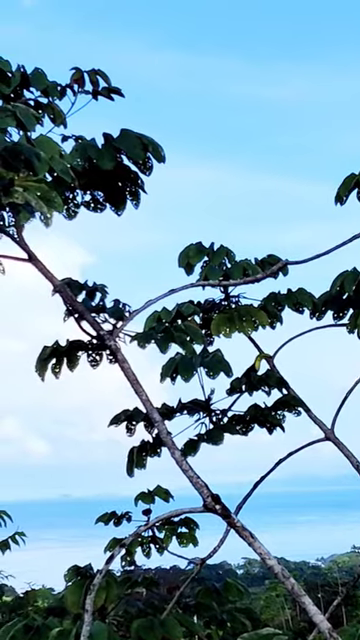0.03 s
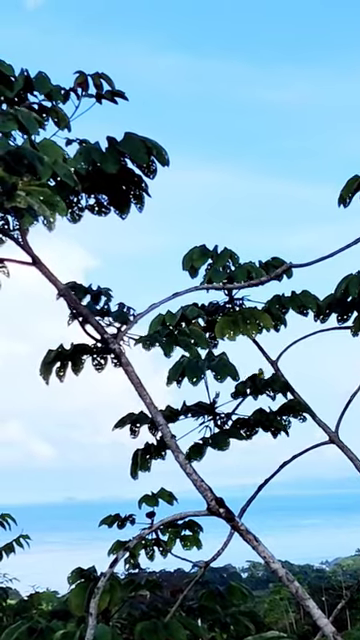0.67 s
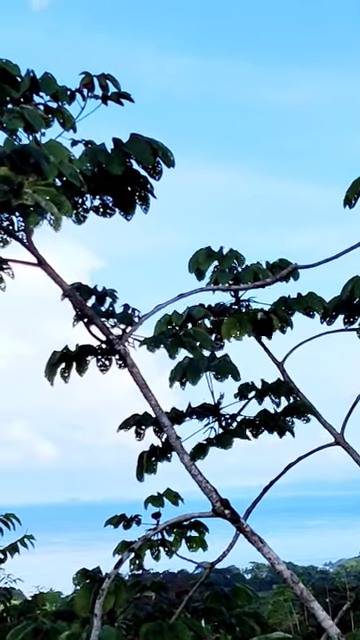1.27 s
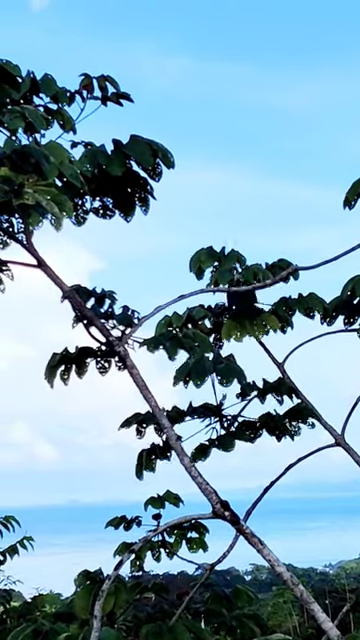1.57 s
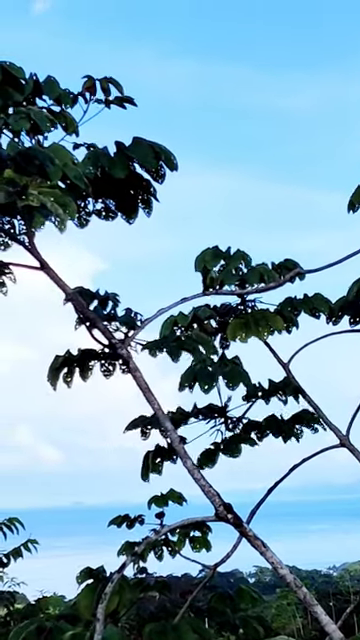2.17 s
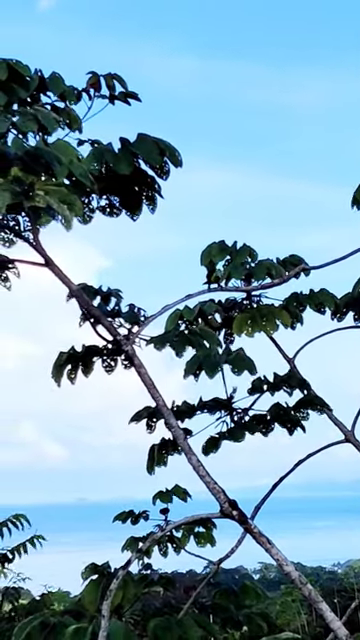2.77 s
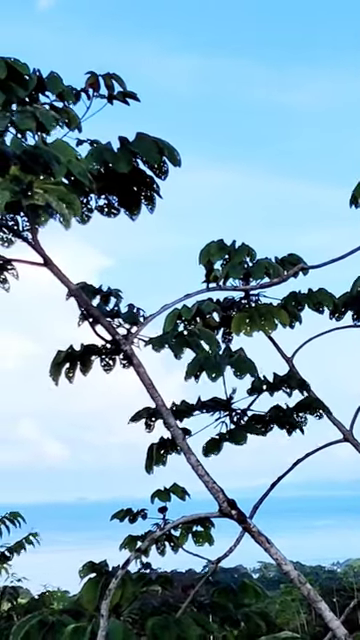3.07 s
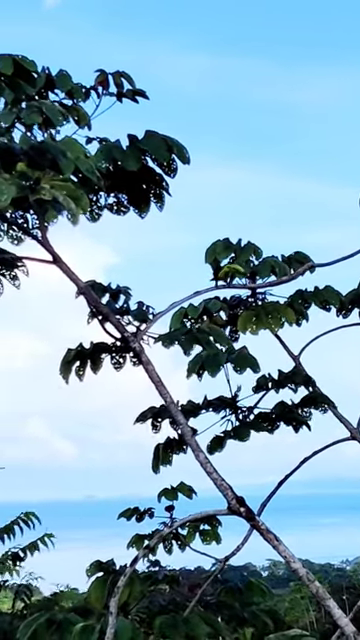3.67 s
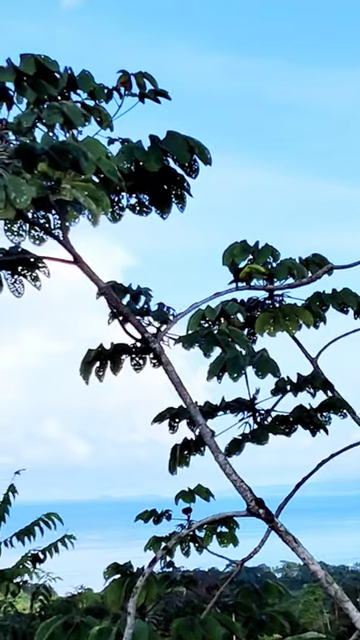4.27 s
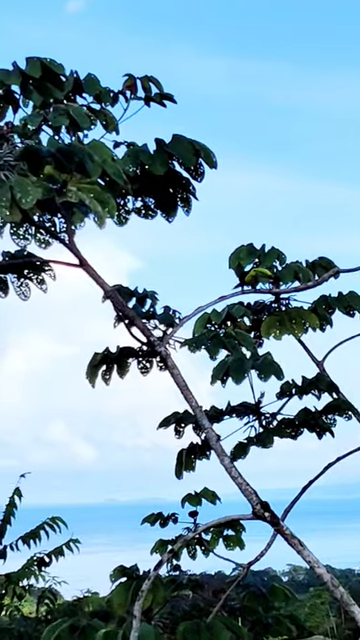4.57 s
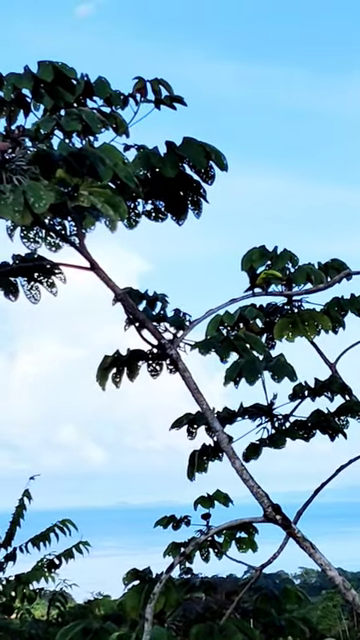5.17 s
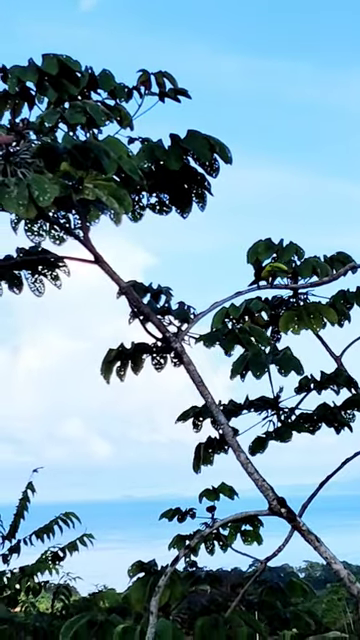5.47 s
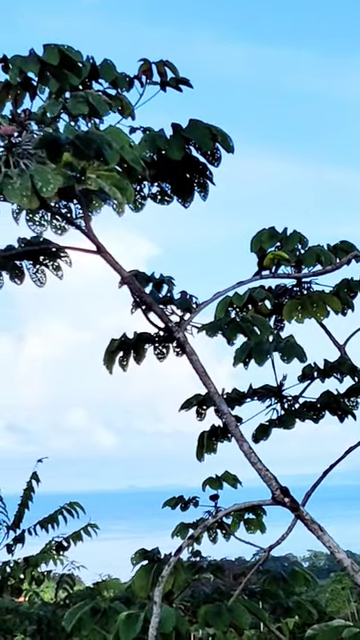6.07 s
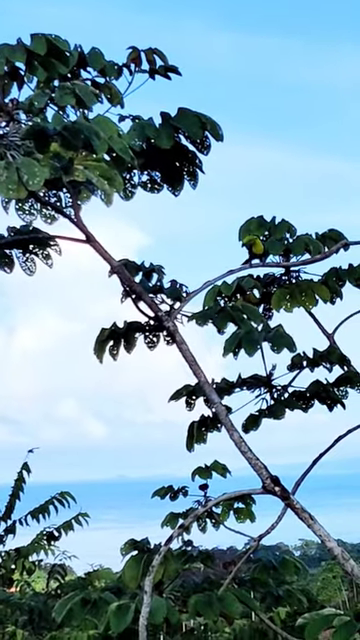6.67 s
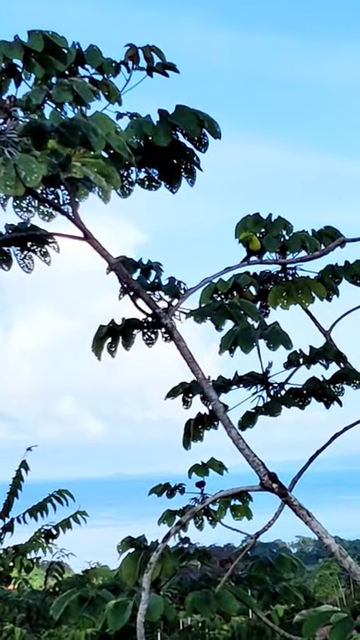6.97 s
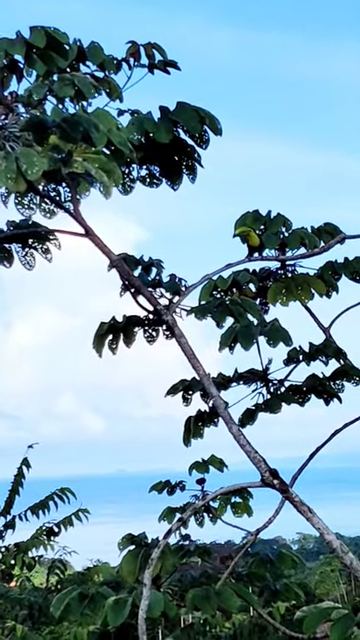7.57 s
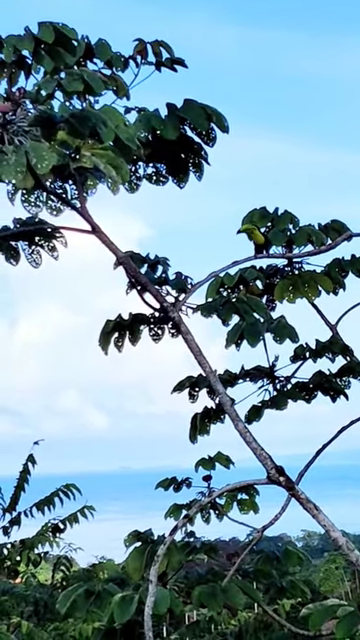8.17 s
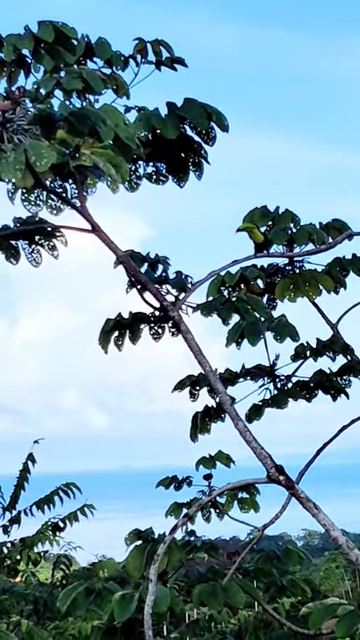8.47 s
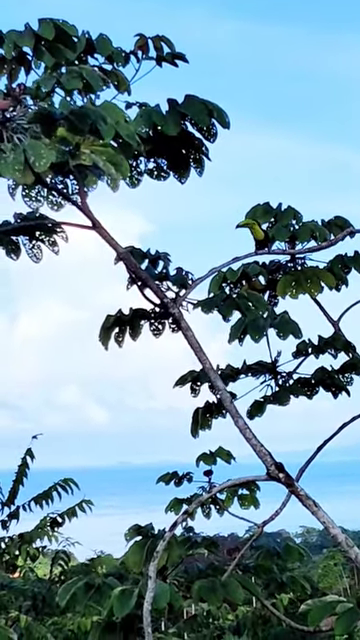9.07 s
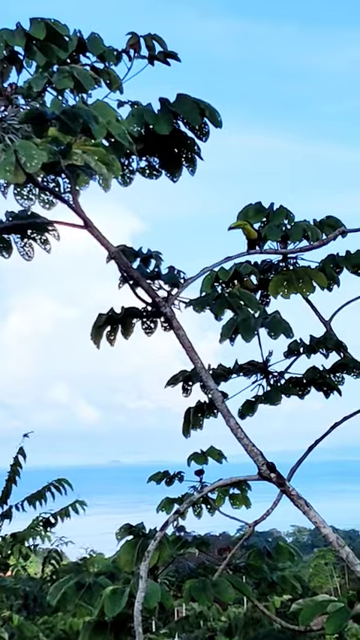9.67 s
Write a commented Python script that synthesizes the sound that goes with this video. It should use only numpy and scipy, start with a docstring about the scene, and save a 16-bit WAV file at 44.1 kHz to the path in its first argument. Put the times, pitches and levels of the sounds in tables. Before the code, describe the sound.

Toucans call with sharp falling chirps, nasal yelps and dry rattles over steadily buzzing insects in a forest.

```python
"""Toucans call in a tree on a forested hillside: one gives sharp falling chirps, another nasal yelps
and dry rattles. Each call is a frequency-modulated tone with harmonics, shaped by a swell or by pulses.
Farther birds whistle and trill in pure tones, and insects buzz steadily over a low distant rumble
and a faint hiss. The foliage scatters every bird call back as reverberation."""
import sys
import numpy as np
from scipy import signal
from scipy.fft import rfft, irfft
from scipy.io import wavfile

SR = 44100
rng = np.random.default_rng(int(sys.argv[2]) if len(sys.argv) > 2 else 0)


def generate_wav(sig):
    """Save sig (samples, or channels by samples) to the path in sys.argv[1] as 16-bit PCM at SR."""
    pcm = np.round(np.clip(np.atleast_2d(sig).T, -1, 1) * 32767).astype(np.int16)
    wavfile.write(sys.argv[1], SR, pcm)


N = 437472
TIME = np.arange(N) / SR

# Levels in the tables are relative. Yelps: onset t/s, duration/s, final f/Hz, level/dB
YELP_CALLS = [(-.1, .2, 1727, -48), (0.49, .22, 1790, -46), (1.095, 0.21, 1761, -42),
              (1.727, 0.2, 1781, -42.5), (2.362, .17, 1745, -48), (4.138, 0.14, 1693, -48.5),
              (4.827, .15, 1663, -49.5), (5.482, 0.15, 1664, -48.5), (6.158, 0.17, 1723, -46.5),
              (6.786, 0.15, 1716, -44.5), (7.412, .16, 1672, -47.5), (8.007, .15, 1674, -48),
              (8.632, 0.15, 1653, -50), (9.31, 0.14, 1663, -51)]
# Spectrum of the far insects: f/Hz, level/dB
CHORUS_SPECTRUM = [(5250, -61.5), (5550, -13), (5850, -10), (6150, -6.5), (6380, -8), (6620, -6.5),
                   (6800, -13.5), (7050, -56)]
# Spectrum of the distant rumble: f/Hz, level/dB
RUMBLE_SPECTRUM = [(15, -27), (25, 3), (96, -2.5), (318, -14), (403, -18), (690, -18.5), (1090, -25.5),
                   (1400, -37), (1820, -66), (3080, -120)]
# Spectrum of the forest's hiss: f/Hz, level/dB
HISS_SPECTRUM = [(700, -27), (1200, -0.5), (1800, 1), (2500, 0.5), (4000, -2.5), (5300, -5.5),
                 (7000, -13.5), (8000, -9.5), (9000, -28), (12500, -18.5)]
# Chirps: mid-fall t/s, level/dB, fall rate/(Hz/s), lead-in level re the chirp/dB
CHIRP_CALLS = [(0.383, -32.5, 25100, -2.5), (0.6357, -34.5, 31200, -25), (0.9227, -34, 28500, -16),
               (1.2495, -33, 33800, -19), (1.8619, -34, 27500, -4), (2.1787, -33.5, 32200, -9),
               (3.144, -34.5, 29400, -5), (3.659, -30.5, 26500, -12), (4.0055, -33.5, 29400, -11),
               (5.015, -35, 28400, -3.5), (5.5828, -33, 26600, -6.5), (6.0717, -32, 28500, -10.5),
               (6.385, -34, 25800, -5), (6.945, -32.5, 26600, -8.5), (7.405, -34, 27200, -11),
               (7.887, -32, 28500, -10.5), (8.7736, -34, 29800, -8), (9.2709, -33, 27400, -10),
               (9.7333, -33.5, 26400, -2)]
# Rattles: onset t/s, duration/s, nominal final f/Hz, level/dB, direct-path gain/dB
RATTLE_CALLS = [(1.413, 0.063, 2280, -48, 1), (2.839, 0.11, 2017, -41.5, -2.5),
                (2.994, 0.069, 1968, -42.5, -6), (3.552, 0.069, 1984, -42, -10),
                (4.265, 0.11, 2134, -42.5, -2), (4.458, 0.047, 2040, -40.5, -5),
                (5.081, 0.061, 2027, -41.5, 1), (5.206, .097, 2020, -45.5, 2), (5.737, .12, 2075, -41, -8),
                (7.566, 0.1, 2110, -42, 8), (8.211, 0.12, 1930, -41, 7.5), (8.885, 0.12, 2033, -39, 6),
                (9.596, 0.11, 2174, -38, 9)]
# Whistles: onset t/s, duration/s, first f/Hz, last f/Hz, glide curvature, level/dB, peak time/duration
WHISTLE_CALLS = [(1.624, .04, 2130, 2020, .2, -55, 0.42), (2.819, 0.82, 5040, 2578, 0.52, -62, 0.97),
                 (2.921, .53, 9100, 6700, 1.2, -76, 0.78), (3.047, 0.61, 473, 476, 1, -67, 0.45),
                 (3.575, .2, 8300, 7300, 4, -70, .55), (3.835, 0.12, 2645, 2920, 5.3, -51, 0.17),
                 (4.06, .265, 613, 861, 6.94, -53.5, 0.29), (6.569, .145, 8060, 3480, 2, -58, 0.61)]
# Course of the trill: t/s, note rate/Hz, f/Hz, level/dB
TRILL_COURSE = [(2.155, 15.5, 1020, -59.5), (2.878, 20.8, 936, -54), (3.2, 22.24, 1068, -49),
                (3.5, 21.69, 1014, -50.5), (3.7, 20.04, 1114, -45), (3.83, 17, 1063, -46.5)]
# Likeness of the diffuse field at the two microphones: f/Hz, correlation coefficient
COHERENCE = [(30, 0.86), (100, 0.99), (250, 0.93), (500, 0.83), (900, 0.52), (1600, 0.41), (12000, 0.14)]
# Reverberation time of the forest: f/Hz, T60/s
FOREST_T60 = [(800, 0.46), (1700, 0.8), (2600, 0.75), (5000, 0.87), (9000, 0.26)]


def amp(db):
    """Amplitude ratio of a level in decibels."""
    return 10 ** (np.asarray(db) / 20)


def unit(x):
    """Normalisation to rms 1."""
    return x / np.sqrt(np.mean(x ** 2) + 1e-20)


def read(points, hz):
    """Interpolation of a table on a logarithmic frequency axis."""
    f, value = np.transpose(points)
    return np.interp(np.log(hz + 1), np.log(f + 1), value)


def add(mix, s, sound):
    """Superposition of a sound on the mix at time s."""
    start = round(s * SR)
    sound = sound[max(-start, 0):]
    part = mix[max(start, 0):][:len(sound)]
    part += sound[:len(part)]


def wander(size, bandwidth_hz):
    """Random modulation: low-pass Gaussian noise of rms about 1."""
    hz = np.fft.rfftfreq(size + SR, 1 / SR)
    return unit(irfft(rfft(rng.standard_normal(size + SR)) * np.exp(-(hz / bandwidth_hz) ** 2)))[:size]


def angle(hz):
    """Phase as the time integral of frequency."""
    return 2 * np.pi * np.cumsum(hz) / SR


def diffuse_noise(spectrum):
    """A diffuse field at two microphones is most coherent at long wavelengths."""
    hz = np.fft.rfftfreq(N, 1 / SR)
    left, other = rfft(rng.standard_normal((2, N)))
    same = read(COHERENCE, hz)
    right = same * left + np.sqrt(1 - same ** 2) * other
    return unit(irfft(np.array([left, right]) * amp(read(spectrum, hz)), N))


def yelps(scoop=.14, pulse_hz=43, nasal_db=-49.5):
    """Amplitude modulation: croaking pulses quicken and fuse into a hoarse, rising nasal tone."""
    tone, nasal = np.zeros((2, N))
    for s, length, top_hz, db in YELP_CALLS:
        t = np.arange(-.008, length + .03, 1 / SR)
        progress = np.clip(t / length, 0, 1)
        stutter_s = .0506 * 2 ** ((top_hz - 1701) / 58.8)  # higher yelps take longer to fuse
        apart = np.clip(1 - t / stutter_s, 0, 1)
        jitter = (.018 + .05 * apart) * wander(len(t), 400)
        phase = angle(top_hz * (1 - scoop * (1 - progress) ** 1.7) * (1 + jitter))
        cycles = pulse_hz * t + 250 * np.maximum(t, 0) ** 3
        sharpness = 14 * apart ** 1.3 + .12
        pulses = (1 + 4.2 * apart * (1 - apart)) * np.exp(sharpness * (np.cos(2 * np.pi * cycles) - 1))
        swell = amp(np.interp(progress, [0, .4, .7, 1], [-7, -3.5, 0, -7]) + 2 * wander(len(t), 190))
        fade = np.clip((t[-1] - t) / .034, 0, 1) * np.clip((t - t[0]) / .0068, 0, 1)
        level = swell * pulses * fade
        overtones = sum(gain * np.sin(k * phase)
                        for k, gain in enumerate(amp([2, -2.5, -23.5, -28.5, -35]), 2))
        dull_db = 11 * (1 - progress) ** 2 + 7 * apart  # the opening croaks are nearly pure
        add(tone, s + t[0], amp(db) * level * np.sin(phase))
        add(nasal, s + t[0], amp(nasal_db - dull_db) * level * overtones)
    return tone, nasal


def insects(stroke_hz=74.7, shrill_hz=6345):
    """Body resonance filters a near insect's falling strokes, over a far chorus and a shrill note."""
    stroke = angle(stroke_hz * (1 + .003 * wander(N, 2))) / (2 * np.pi) % 1
    phase = angle(6600 - 1250 * stroke ** 1.5 + 130 * wander(N, 500))
    level = np.sin(np.pi * stroke) ** 2 * np.exp(-2.2 * stroke) * (1 + .45 * wander(N, 260))
    body = signal.butter(4, [5500, 6750], "bandpass", fs=SR, output="sos")
    buzz = unit(signal.sosfilt(body, level * np.sin(phase)))
    shrill = np.array([unit((1 + .4 * wander(N, 20)) * np.sin(angle(shrill_hz + 26 * wander(N, 60))))
                       for _ in range(2)])
    near = amp(-4) * direct_path(buzz, lag_ms=.2, left_db=5)
    far = (diffuse_noise(CHORUS_SPECTRUM) + amp(-5) * shrill) * amp([[-2.6], [-4.8]])
    return amp(-58 + .3 * wander(N, 2)) * (near + far)


def rumble_and_hiss():
    """Diffuse noise: a low rumble from afar and the forest's faint hiss, each wavering in level."""
    rumble = amp(-53.5 + .99 * wander(N, 7)) * diffuse_noise(RUMBLE_SPECTRUM)
    hiss = amp(-68 + .9 * wander(N, .6)) * diffuse_noise(HISS_SPECTRUM)
    return rumble + hiss


def chirps(usual_top_hz=2693, usual_fall_hz_per_s=28400, knee_hz=90):
    """Frequency sweep: a near-pure tone holds its pitch, drops about an octave and ends in a soft note."""
    tone, overtones = np.zeros((2, N))
    t = np.arange(-.055, .048, 1 / SR)
    note_t = np.arange(0, .05, 1 / SR)
    low_note = np.hanning(len(note_t)) * np.sin(angle(930 - 1500 * note_t))
    corners_s = [-.055, -.04, -.026, -.015, .002, .018, .036, .047]
    rough_db = np.interp(t, [t[0], 0], [1.5, 2.23])
    for s, db, fall, lead_db in CHIRP_CALLS:
        top_hz = usual_top_hz * (1 + .00787 * rng.standard_normal())
        plunge_hz = 2200 - fall * t * (1 - 3 * np.maximum(t, 0))
        hz = top_hz - knee_hz * np.logaddexp(0, (top_hz - plunge_hz) / knee_hz)  # smooth minimum
        phase = angle(hz * (1 + .0094 * wander(len(t), 300)))
        end_db = -10 - 11.5 * (fall / usual_fall_hz_per_s - 1)  # a faster plunge ends more faintly
        corners_db = [-40, lead_db - 13, lead_db, -.7, -3.3, end_db, end_db - 13, -50]
        level = amp(db + np.interp(t, corners_s, corners_db) + rough_db * wander(len(t), 150))
        harmonics = amp(-19.5) * np.sin(2 * phase) + amp(-35.5) * np.sin(3 * phase)
        add(tone, s + t[0], level * np.sin(phase))
        add(overtones, s + t[0], level * (hz / top_hz) ** 3 * harmonics)
        add(tone, s + .035, amp(db + end_db - 19.5) * low_note)
    return tone, overtones


def rattles(pulse_hz=43, climb=.17):
    """Pulse train: dry tone bursts lengthen and climb. Returns what passes the leaves, and the whole."""
    through_leaves, whole = np.zeros((2, N))
    for s, length, last_hz, db, direct_db in RATTLE_CALLS:
        t = np.arange(-.002, length, 1 / SR)
        width_s = np.interp(t, [0, length], [.0015, .0031])
        age = (t - t[0]) % (1 / pulse_hz) / width_s
        pulses = age ** 2 * np.exp(2 - 2 * age) + .041
        hz = last_hz * (1 - climb * (1 - t / length))
        droop = .29 * (np.exp(-age) - .3)  # the pitch falls within each pulse
        phase = angle(hz * (1 + droop + .044 * wander(len(t), 530)))
        swell_db = np.interp(t / length, [0, .65, 1], [-8, -1, -5.5])
        level = amp(db + swell_db) * pulses * signal.windows.tukey(len(t), .04)
        first, second, third = (level * np.sin(k * phase) for k in (1, 2, 3))
        add(through_leaves, s + t[0], amp(direct_db) * (first + amp(-28) * second))
        add(whole, s + t[0], first + amp(-11.5) * second + amp(-21) * third)
    return through_leaves, whole


def whistles():
    """Exponential glides: pure tones swell and fade; the high ones quaver and flutter most."""
    out = np.zeros(N)
    for s, length, first_hz, last_hz, bend, db, peak in WHISTLE_CALLS:
        progress = np.arange(0, length, 1 / SR) / length
        size = len(progress)
        hz = first_hz + (last_hz - first_hz) * np.expm1(-bend * progress) / np.expm1(-bend)
        swell_db = np.interp(progress, [0, min(peak, .95), 1], [-7, 0, -10])
        quaver = np.sqrt(hz.mean() / 4000)
        phase = angle(hz * (1 + .02 * quaver * wander(size, 200)))
        flutter_db = 2.5 * quaver * wander(size, 35)
        add(out, s, amp(db + swell_db + flutter_db) * np.sin(phase) * signal.windows.tukey(size, .08))
    return out


def trill(note_s=.03, rise_hz_per_s=7500, scatter_hz=35):
    """Repeated sweeps: upslurred notes, about twenty a second, hurry in mid-trill and grow louder."""
    out = np.zeros(N)
    t = np.arange(-note_s / 2, note_s / 2, 1 / SR)
    slur_hz = rise_hz_per_s * t - 200000 * t ** 2
    when, rate, pitch_hz, level_db = np.transpose(TRILL_COURSE)
    clock = np.arange(when[0], when[-1], 1 / SR)
    note_count = np.cumsum(np.interp(clock, when, rate)) / SR
    for s in np.interp(np.arange(note_count[-1]), note_count, clock):
        hz = np.interp(s, when, pitch_hz) + scatter_hz * rng.standard_normal()
        db = np.interp(s, when, level_db) - 3.5 + rng.standard_normal()
        add(out, s + t[0], amp(db) * np.hanning(len(t)) * np.sin(angle(hz + slur_hz)))
    return out


def direct_path(x, lag_ms, left_db):
    """Path difference: sound from the right reaches the left microphone later. Level is left re right."""
    hz = np.fft.rfftfreq(N, 1 / SR)
    late = irfft(rfft(x) * np.exp(-2j * np.pi * hz * lag_ms / 1000), N)
    return np.array([late, x]) * amp([[left_db / 2], [-left_db / 2]])


def forest(x, echoes_per_s=3000, build_s=.0012, foliage_s=.043):
    """Scattering by swaying foliage: nearby leaves answer first, then the whole slope reverberates."""
    leaves = signal.butter(2, 1050, "highpass", fs=SR, output="sos")  # they barely reflect long waves
    x = signal.sosfilt(leaves, x)
    out = np.zeros((3, N))  # left, right, and from the birds' side
    for k in range(3):
        echoes = rng.standard_normal((3, SR)) * (rng.random((3, SR)) < echoes_per_s / SR)
        hz, t, spectra = signal.stft(echoes, SR, nperseg=256)
        decay = amp(-60 * t / read(FOREST_T60, hz)[:, None]) + amp(3) * np.exp(-t / foliage_s)
        tail = signal.istft(spectra * decay * (1 - np.exp(-t / build_s)), SR, nperseg=256)[1]
        sway = np.sqrt(2 / 3) * np.cos(2 * np.pi * (.27 * TIME + k / 3))  # crossfades the echo patterns
        out += signal.oaconvolve((x * sway)[None], tail / np.linalg.norm(tail[0]), axes=1)[:, :N]
    return amp(-2.5) * direct_path(out[2], lag_ms=.16, left_db=-1) + amp(-1.5) * out[:2]


def scene():
    """Direct and scattered fields add; the toucans, on the right, beam their overtones into the leaves."""
    chirp, chirp_overtones = chirps()
    rattle_direct, rattle = rattles()
    yelp, nasal = yelps()
    whistle, far_trill = whistles(), trill()
    direct = (direct_path(chirp + amp(-4.5) * chirp_overtones, lag_ms=.15, left_db=0)
              + direct_path(amp(1) * yelp + rattle_direct, lag_ms=.16, left_db=2)
              + direct_path(amp(-4) * nasal, lag_ms=.19, left_db=-4)
              + direct_path(far_trill + whistle, lag_ms=.12, left_db=2.5))
    into_foliage = (amp(-5.5) * chirp + amp(-1) * chirp_overtones + amp(1.5) * yelp + amp(-.5) * nasal
                    + amp(-.5) * rattle + amp(-8) * far_trill + amp(-1) * whistle)
    return direct + forest(into_foliage) + insects() + rumble_and_hiss()


def record(dry, cutoff_hz=12750):
    """Band limiting: a steep low-pass filter removes the highest treble."""
    lowpass = signal.firwin(511, cutoff_hz, window=("kaiser", 9), fs=SR)
    return signal.oaconvolve(dry, lowpass[None], "same")


dry = scene()
out = record(dry)
generate_wav(out)
```